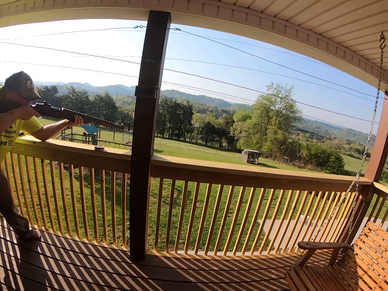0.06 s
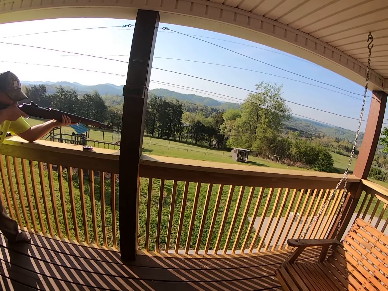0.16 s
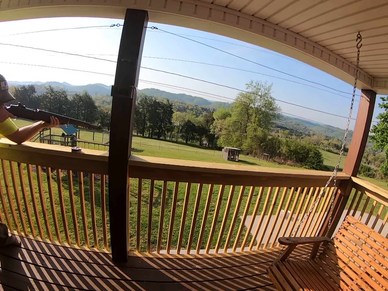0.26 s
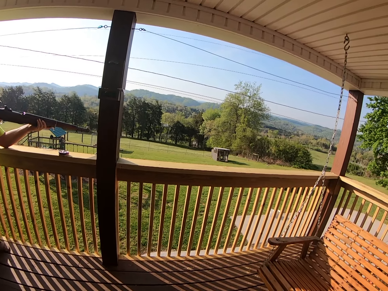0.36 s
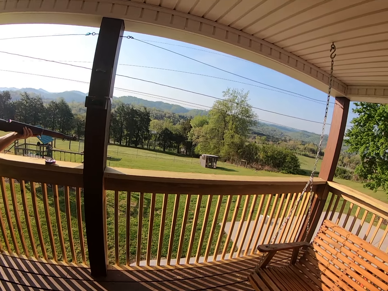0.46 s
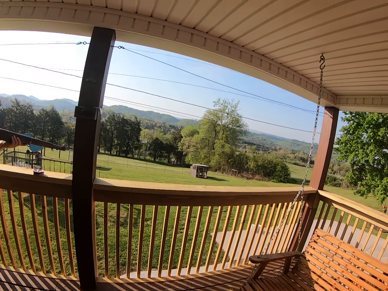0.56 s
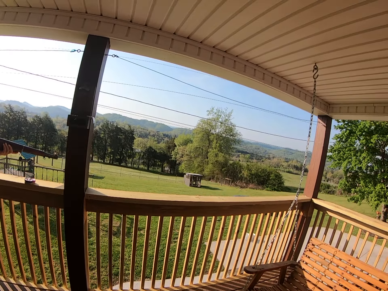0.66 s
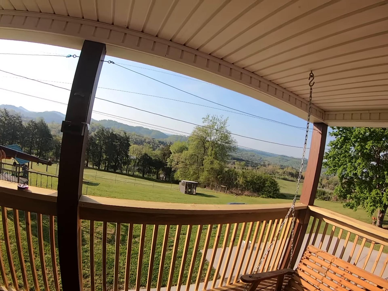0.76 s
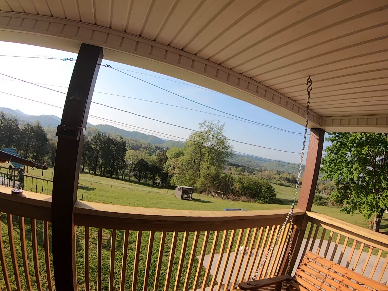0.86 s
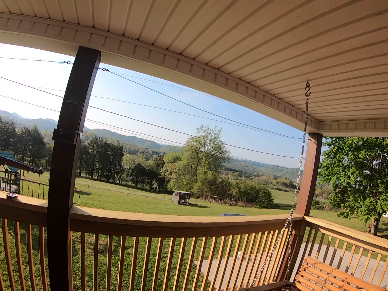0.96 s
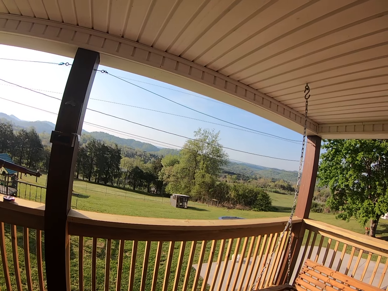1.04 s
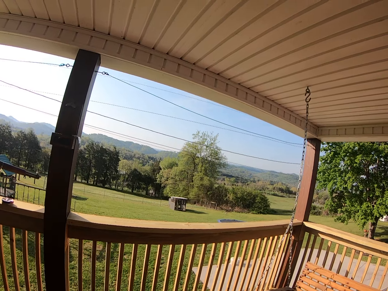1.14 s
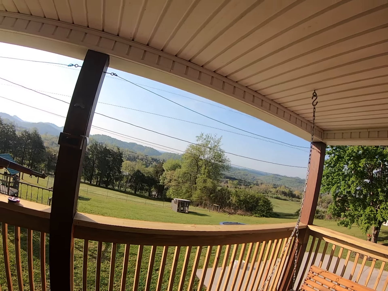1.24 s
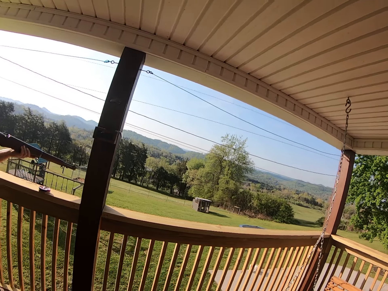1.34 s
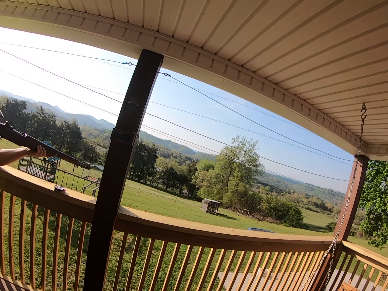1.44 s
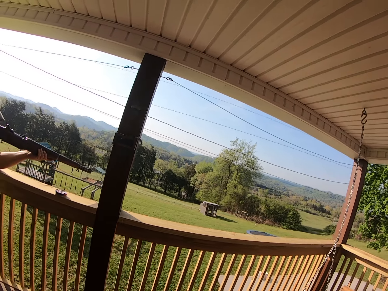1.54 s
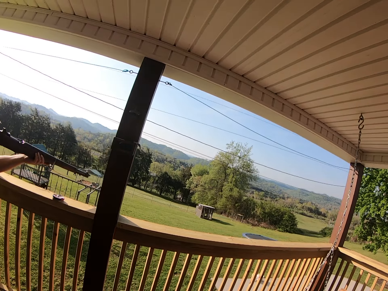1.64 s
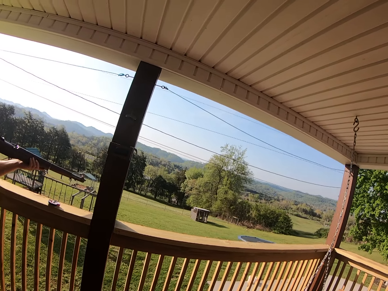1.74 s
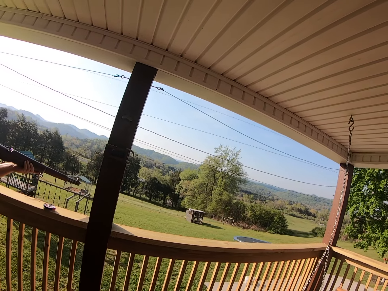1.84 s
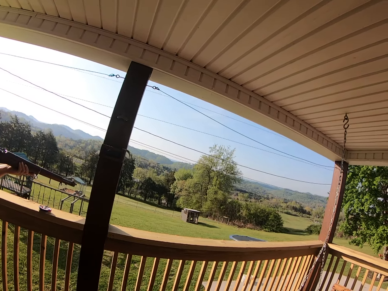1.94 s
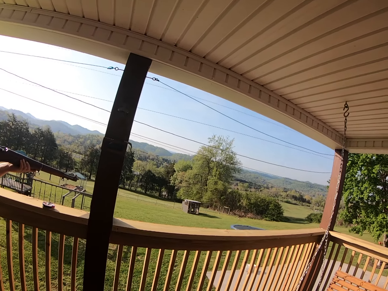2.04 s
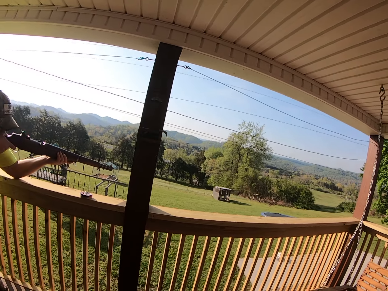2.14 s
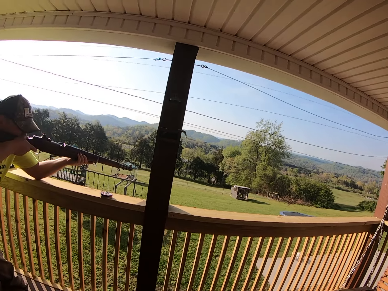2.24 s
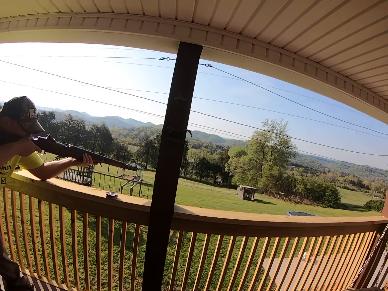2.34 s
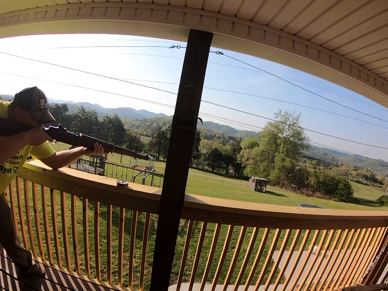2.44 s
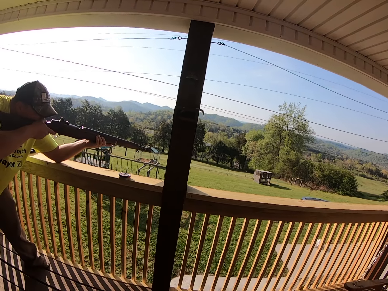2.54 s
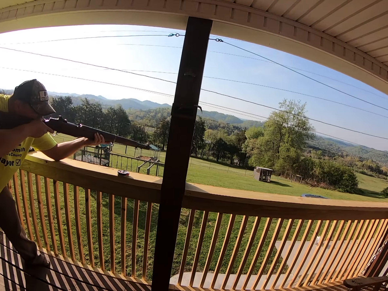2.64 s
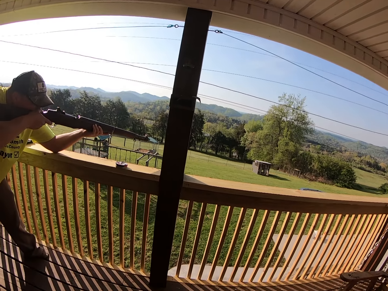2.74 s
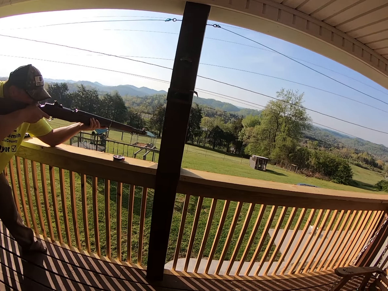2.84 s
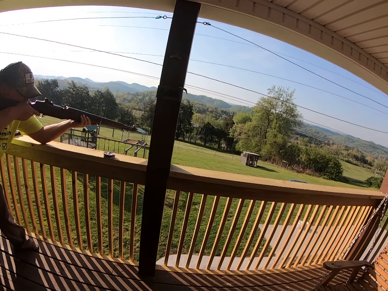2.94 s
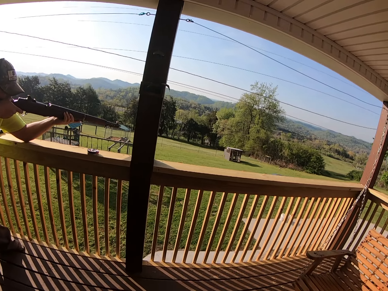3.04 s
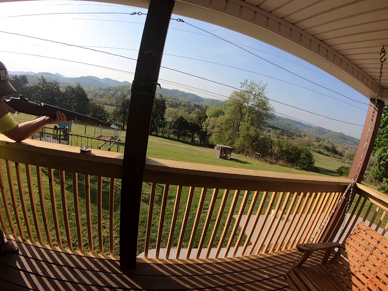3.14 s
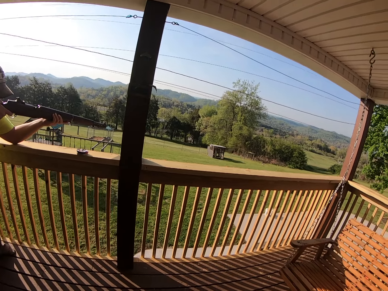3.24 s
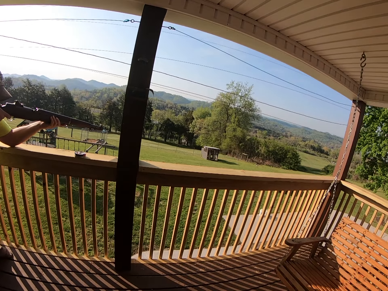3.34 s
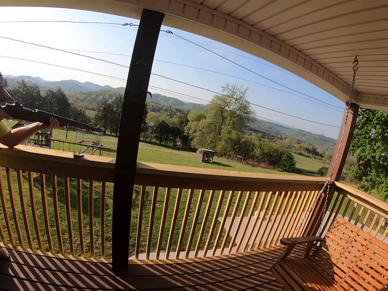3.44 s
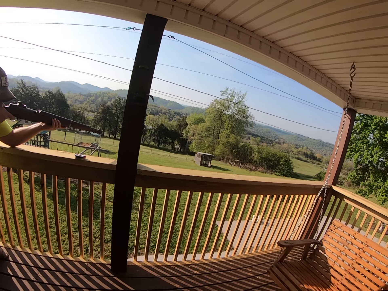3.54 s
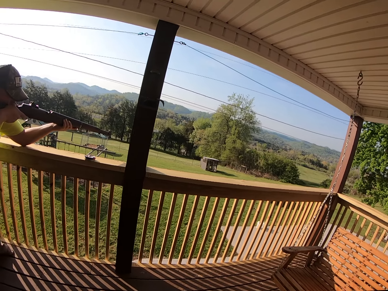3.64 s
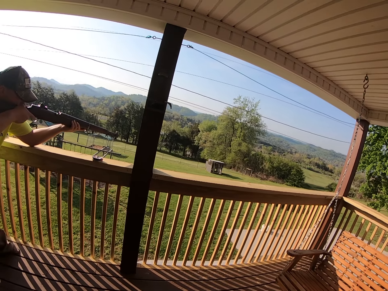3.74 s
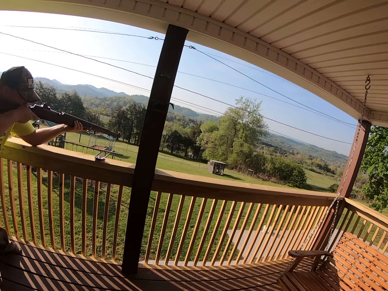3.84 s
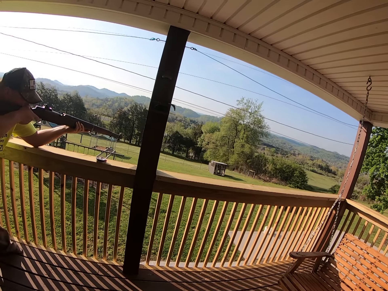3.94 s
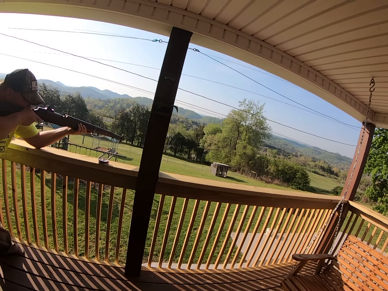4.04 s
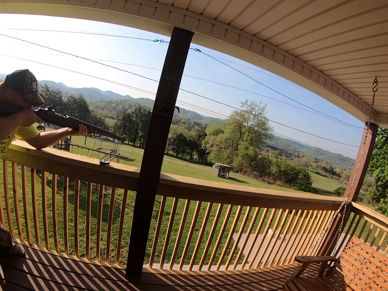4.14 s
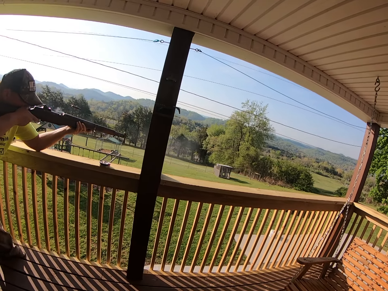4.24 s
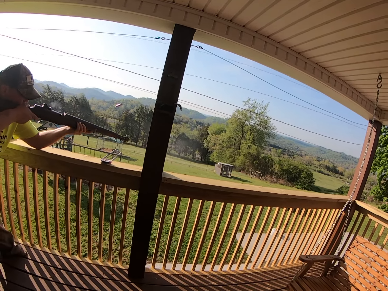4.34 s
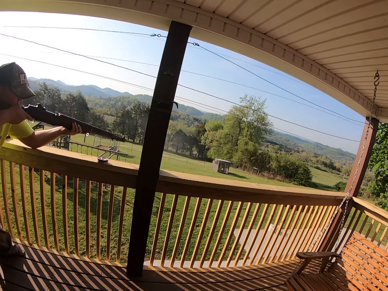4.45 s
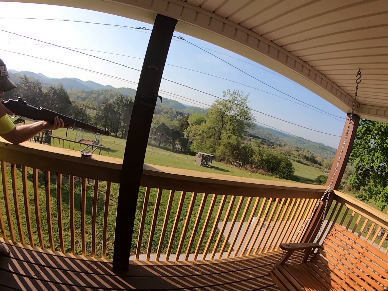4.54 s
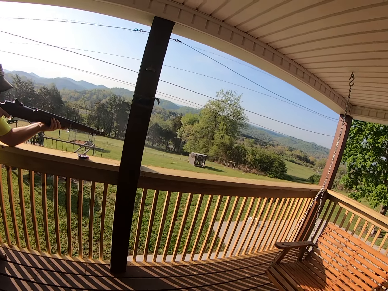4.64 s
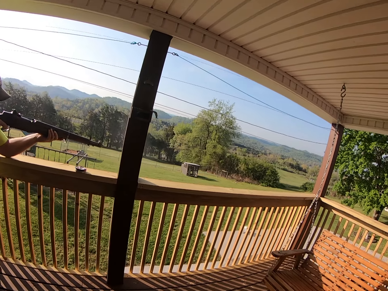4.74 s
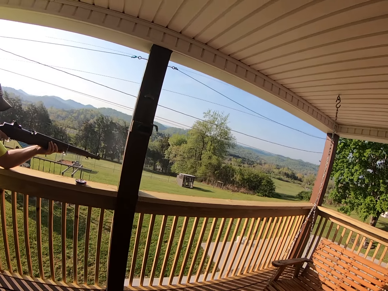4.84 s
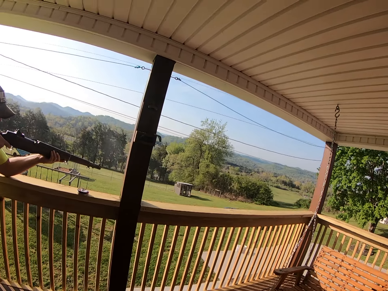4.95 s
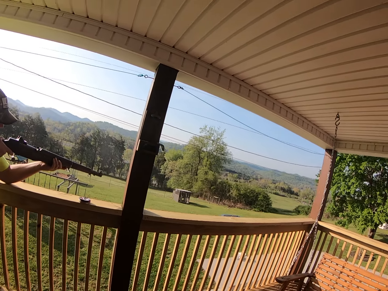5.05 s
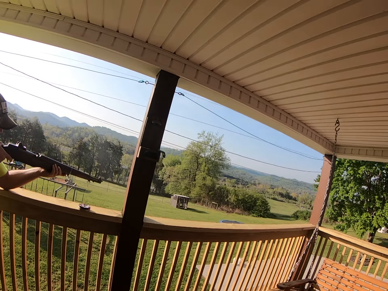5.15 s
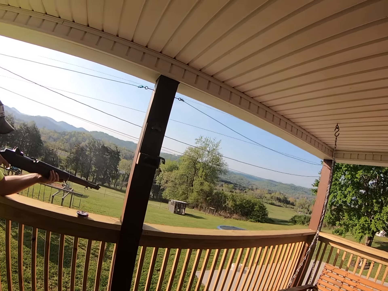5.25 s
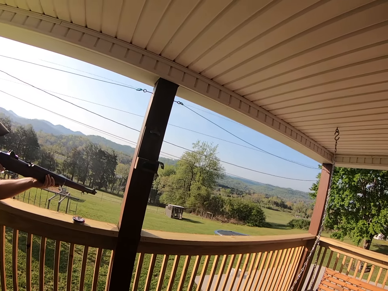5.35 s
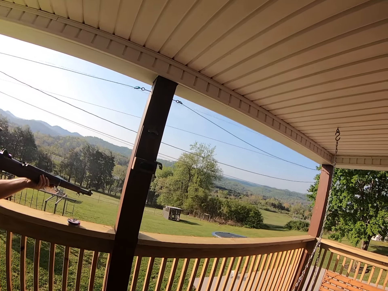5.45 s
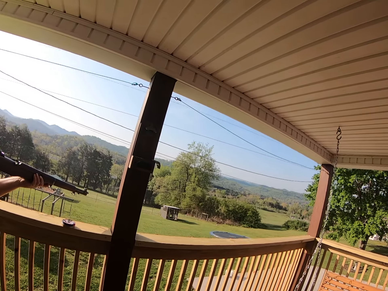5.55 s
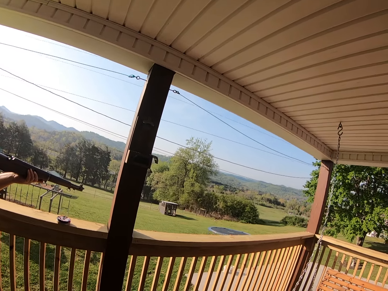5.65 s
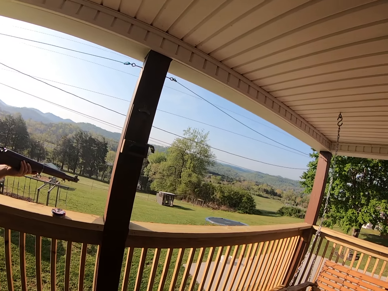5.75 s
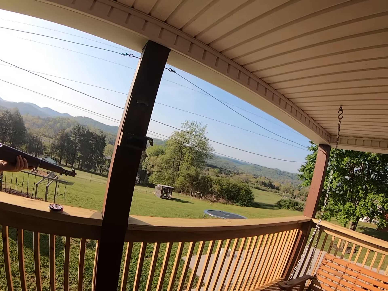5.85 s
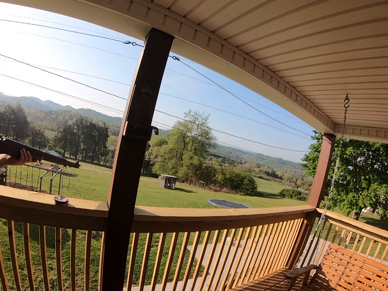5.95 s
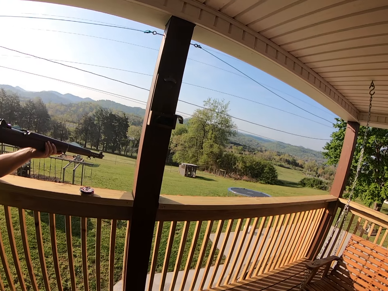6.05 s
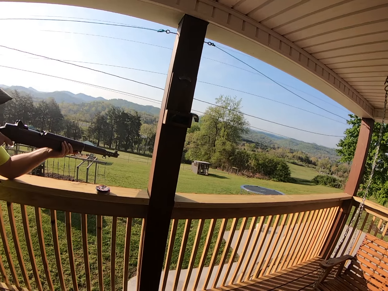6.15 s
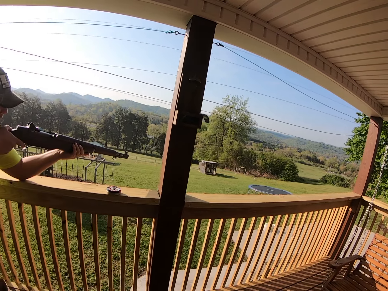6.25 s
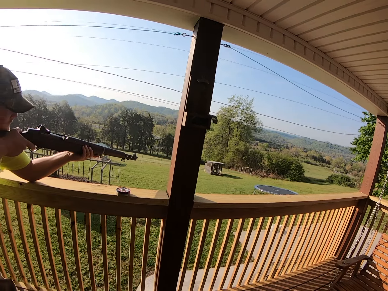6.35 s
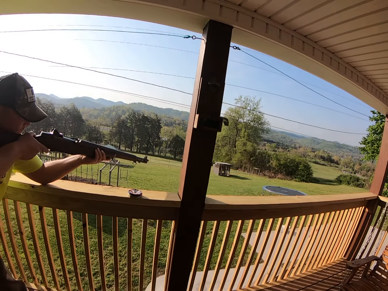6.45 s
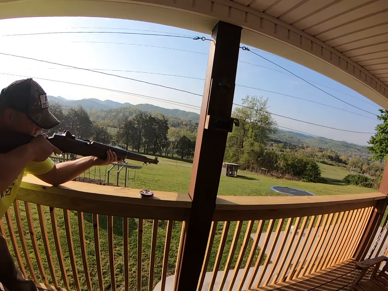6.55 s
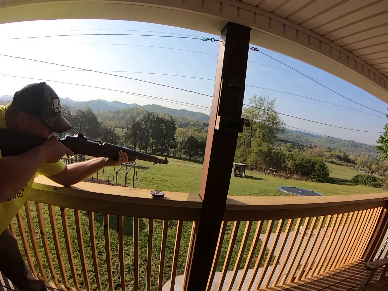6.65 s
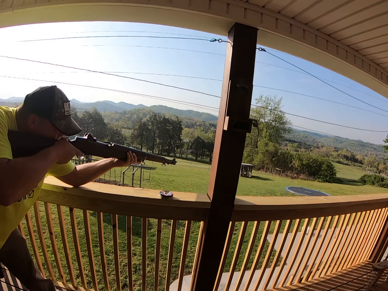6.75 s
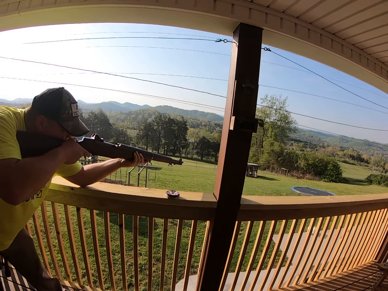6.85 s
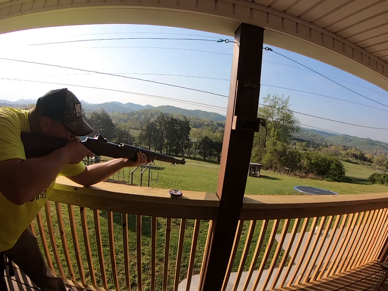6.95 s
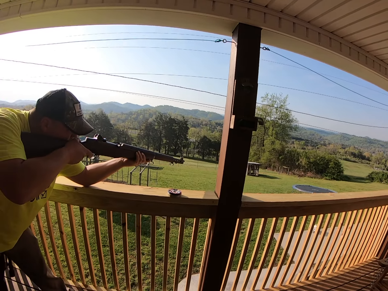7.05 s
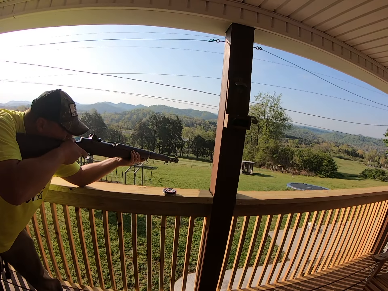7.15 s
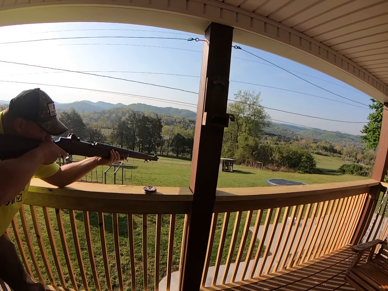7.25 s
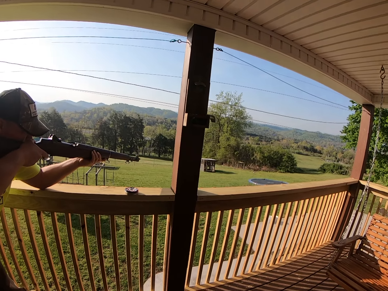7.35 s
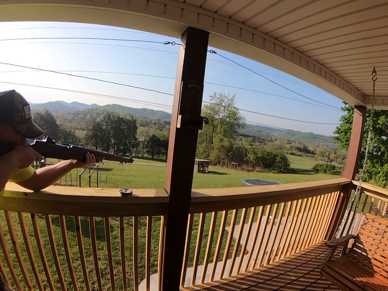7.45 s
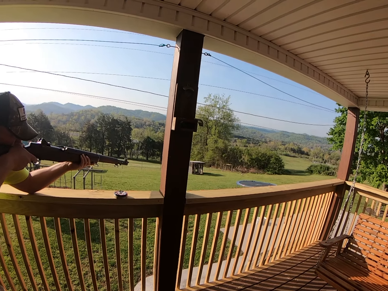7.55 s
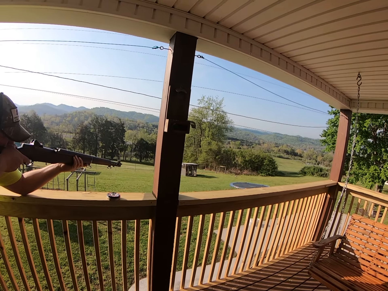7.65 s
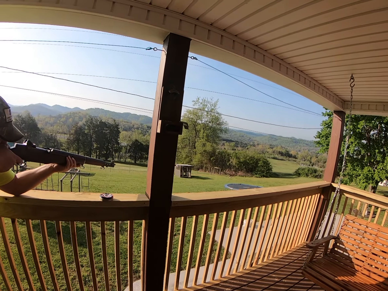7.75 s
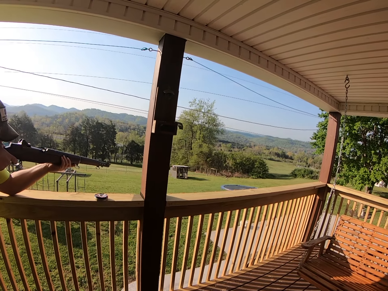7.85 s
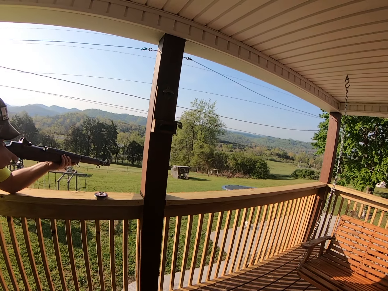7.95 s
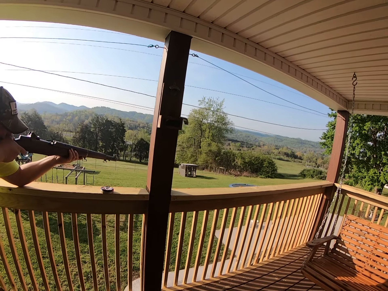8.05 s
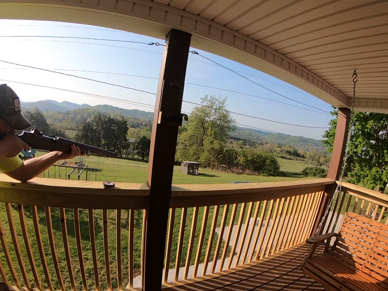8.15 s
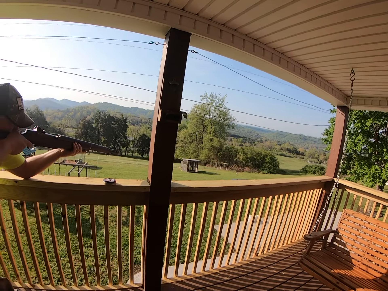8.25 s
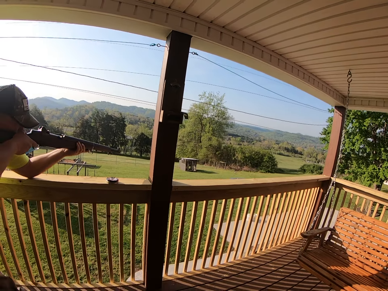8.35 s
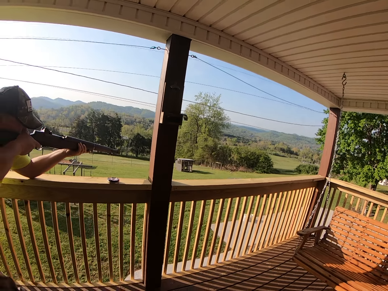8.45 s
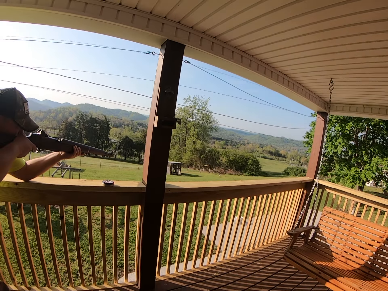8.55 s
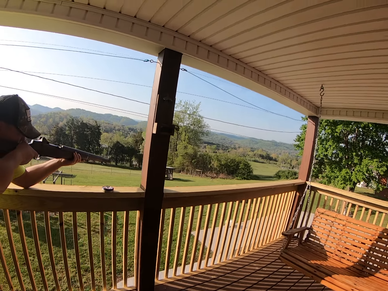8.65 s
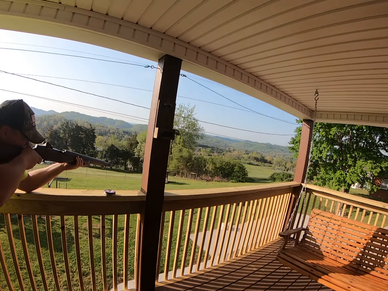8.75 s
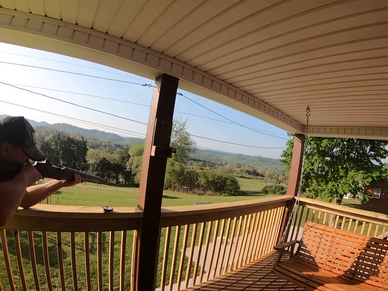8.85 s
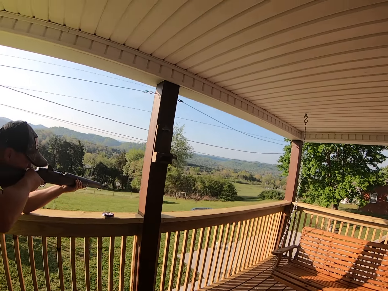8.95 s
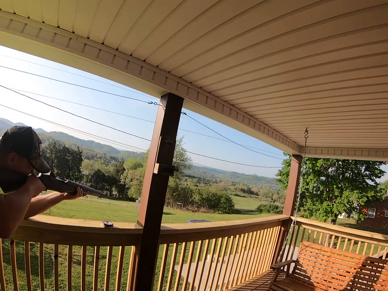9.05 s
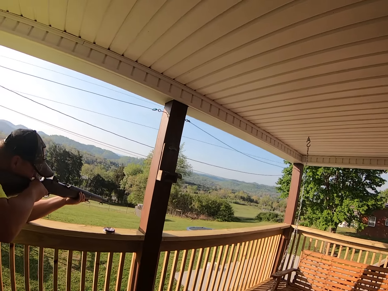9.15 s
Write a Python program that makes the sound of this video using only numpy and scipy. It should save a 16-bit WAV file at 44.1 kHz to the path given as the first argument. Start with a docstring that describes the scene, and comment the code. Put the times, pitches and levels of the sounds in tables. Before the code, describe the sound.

A single loud rifle shot breaks through faint birdsong, followed by a shell case bouncing on boards and rolling distant echoes.

```python
"""Birds sing over open fields until a rifle cracks from a wooden porch, a few metres from the listener.
The blast drives the porch's resonances, reflects off near walls, scatters off trees and rolls back
from far hills, its treble absorbed by the air. The spent brass case rings as it bounces on the boards.
Throughout, distant traffic murmurs; close by, clothes rustle, small parts tick and a hand bumps the camera."""
import sys
import numpy as np
from scipy import signal
from scipy.io import wavfile

SR = 44100
rng = np.random.default_rng(int(sys.argv[2]) if len(sys.argv) > 2 else 0)


def output_pcm(signal):
    """Save a mono or channel-first signal as 16-bit PCM at the path in sys.argv[1].

    Samples are clipped to [-1, 1] before scaling.
    """
    pcm = np.clip(np.atleast_2d(signal).T, -1, 1) * 32767
    wavfile.write(sys.argv[1], SR, np.round(pcm).astype(np.int16))


N = 405719
T = np.arange(N) / SR


def undb(db):
    """Decibels to amplitude ratio."""
    return 10 ** (np.asarray(db) / 20)


def at_hz(table, hz):
    """Interpolates (frequency_hz, value) rows on a logarithmic frequency axis."""
    frequencies, values = np.transpose(table)
    return np.interp(np.log(hz), np.log(frequencies), values)


def band(x, hz, width, order=1):
    """Band-pass filter around hz; at order 1, a damped resonator."""
    low = max(hz - width / 2, hz / 4)
    high = min(low + width, .48 * SR)
    return signal.sosfilt(signal.butter(order, [low, high], "bandpass", fs=SR, output="sos"), x)


def noise(shape, hz, width):
    """Band-limited Gaussian noise of unit RMS."""
    x = band(rng.standard_normal(shape), hz, width, order=2)
    return x / np.sqrt(np.mean(x ** 2))


def flutter(rate, size):
    """Random modulation: rate values a second joined by lines, standard deviation near 1."""
    knots = 1.12 * rng.standard_normal(int(size * rate / SR) + 2)
    return np.interp(np.arange(size) * rate / SR, np.arange(len(knots)), knots)


def pan(db):
    """Level difference between channels, left minus right."""
    return undb([[db / 2], [-db / 2]])


def add(out, start_s, x):
    """Superposes x on out."""
    i = int(start_s * SR)
    out[..., i:i + x.shape[-1]] += x[..., :N - i]


def diffuse(spectrum, start_s, end_s, envelope_db, flicker_db, octaves=.33):
    """Diffuse field: partly coherent noise bands follow envelope_db(hz, t), each flickering alone."""
    # likeness of left and right: frequency_hz, correlation
    coherence = [(60, 1), (130, 0.92), (290, 1), (640, 0.2), (1410, 0), (3100, 0.6), (6820, 0),
                 (15000, 0.05)]
    a, b = int(start_s * SR), min(int(end_s * SR), N)
    low, high = spectrum[0][0], spectrum[-1][0]
    centres = low * 2 ** np.arange(octaves / 2, np.log2(high / low), octaves)
    weights = undb(at_hz(spectrum, centres)) * np.sqrt(centres)
    out = np.zeros((2, N))
    for hz, weight in zip(centres, weights / np.linalg.norm(weights)):
        mid, side = noise((2, b - a), hz, hz * octaves * np.log(2))
        alike = at_hz(coherence, hz)
        pair = np.sqrt((1 + alike) / 2) * mid + np.sqrt((1 - alike) / 2) * side * [[1], [-1]]
        out[:, a:b] += weight * pair * undb(envelope_db(hz, T[a:b]) + flicker_db * flutter(14, b - a))
    return out


def reverberate(x, t60_s, wet_db, hz, width):
    """Reverberation: x plus its convolution with decaying noise, independent for each ear."""
    t = np.arange(int(t60_s * SR)) / SR
    response = band(rng.standard_normal((2, len(t))), hz, width) * undb(-60 * t / t60_s)
    response /= np.linalg.norm(response[0])
    return x + undb(wet_db) * signal.fftconvolve(np.atleast_2d(x), response, axes=1)[:, :N]


def field():
    """Distant traffic, air and leaves sum incoherently to a diffuse background."""
    # the background sinks after the shot and creeps back: time_s, level_db
    contour = [(0, -53), (4.3, -55), (4.901, -68), (6.6, -68), (7.999, -63), (9.2, -58)]
    # its spectrum: frequency_hz, relative_density_db
    spectrum = [(13, -38), (22, -7.5), (87, 0), (407, -11), (680, -18), (844, -25.5), (966, -20),
                (1450, -16.5), (1950, -22), (2840, -23), (3930, -28.5), (6230, -70), (8850, -36),
                (14000, -67)]
    times, levels = np.transpose(contour)
    return diffuse(spectrum, 0, N / SR, lambda hz, t: np.interp(t, times, levels),
                   flicker_db=3.7, octaves=.5)


def bird_buzzes():
    """Far calls spread their energy over a band, so they buzz rather than whistle."""
    # calls: start_s, end_s, centre_hz, width_hz, level_db
    calls = [(0, 0.17, 2860, 120, -60.5), (0.234, 0.303, 4900, 800, -64.5), (0.439, 0.698, 4130, 250, -59),
             (0.749, 1.044, 4060, 300, -67), (2.198, 2.62, 4000, 900, -67), (3.42, 4.2, 5220, 80, -78.5),
             (2.66, 2.794, 4080, 150, -68.5), (3.414, 3.575, 3800, 1600, -65), (0, 0.238, 2340, 302, -66),
             (0.54, .75, 2740, 200, -67), (7.67, 7.75, 4490, 350, -66), (7.82, 7.89, 4220, 448, -64)]
    out = np.zeros(N)
    for start, end, hz, width, db in calls:
        buzz = noise(int((end - start) * SR), hz, width)
        add(out, start, undb(db) * buzz * np.hanning(len(buzz)) ** .31)
    return out


def clothes():
    """Friction noise of cloth; overlapping rustles add in power."""
    # rustles, whose swell and fade each span 20 dB: peak_s, level_db, swell_s, fade_s
    rustles = [(.01, -70, 0.011, 0.25), (.31, -74, .025, 0.12), (.57, -80, .03, .04),
               (1.1, -63.5, 0.013, 0.073), (1.37, -67, 0.034, .32), (1.94, -55.5, 0.0081, 0.078),
               (2.18, -70, 0.091, .11), (2.41, -56.5, 0.085, .07), (2.9, -60, 0.094, 0.36),
               (3.2, -69.5, .17, 0.9), (3.66, -61, 0.074, 0.28), (4.17, -67.5, 1, 0.23),
               (6.38, -76, 0.13, .055), (6.48, -72.5, .013, 0.051), (7.3, -64, 0.035, 0.22),
               (7.62, -61, .1, 0.27), (7.92, -64.5, 0.31, 0.14), (8.08, -74.5, .04, 0.33),
               (8.27, -68, .11, 0.36), (8.6, -62, 0.26, 0.17), (8.78, -63, 0.012, 1),
               (9.14, -53.5, 0.44, 0.078)]
    # cloth spectrum: frequency_hz, relative_density_db
    spectrum = [(1500, -4), (3000, 3.5), (5000, -5.5), (6300, -7.5), (8500, 0), (10500, -10),
                (14000, -20.5)]
    power = sum(undb(db - 20 * np.maximum((peak - T) / swell, (T - peak) / fade)) ** 2
                for peak, db, swell, fade in rustles)
    level_db = 10 * np.log10(power + 1e-12)
    return diffuse(spectrum, 0, N / SR, lambda hz, t: level_db, flicker_db=1.2, octaves=.3315)


def whistle(out, contour, at_s=0., db=0., pitch_ratio=.98):
    """A sine glides along contour, its pitch times pitch_ratio; moving air modulates its amplitude."""
    times, pitches, levels = np.transpose(contour)
    t = np.arange(times[0], times[-1], 1 / SR)
    ramps = np.clip(np.minimum(t - t[0], t[-1] - t) / .0022, 0, 1)
    gain = np.sqrt(2) * ramps * undb(db + np.interp(t, times, levels) + 2.5 * flutter(90, len(t)))
    phase = 2 * np.pi * np.cumsum(pitch_ratio * np.interp(t, times, pitches)) / SR
    add(out, at_s + t[0], gain * np.sin(phase))


def bird_whistles():
    """Frequency-modulated tones: chips, glides, a long fall and rising sweeps."""
    # one long falling whistle: time_s, nominal_pitch_hz, level_db
    fall = [(0.42, 5804, -67), (0.533, 4670, -68), (0.632, 3770, -52.5), (0.731, 3435, -49),
            (0.806, 2734, -63), (0.934, 2434, -65), (0.998, 2140, -59), (1.05, 2100, -78)]
    # an up-and-down chip: offset_s, nominal_pitch_hz, relative_db
    chip = [(0, 2700, -0.5), (.024, 3195, 0.5), (.052, 2920, -18)]
    # its occurrences: start_s, level_db
    chips = [(.245, -55), (1.24, -52)]
    # gliding or held notes: start_s, length_s, nominal_first_hz, nominal_last_hz, level_db
    glides = [(.305, .105, 5950, 3750, -64), (1.16, .055, 2400, 1850, -57), (2.96, .115, 6445, 3950, -68),
              (3.14, .1, 1610, 1600, -64), (3.5, .04, 5170, 5170, -65), (3.58, .23, 2670, 2690, -64),
              (3.84, .11, 2690, 2660, -63), (3.98, .26, 2670, 2680, -66)]
    # a rising sweep: offset_from_end_s, nominal_pitch_hz, relative_db
    sweep = [(-.105, 1754, -13), (-.08, 1801, -4.5), (-.055, 1976, -0.5), (-.04, 2339, 0), (-.028, 2755, 1),
             (-.016, 2950, -1.5), (-.006, 3430, -3.5), (0, 4250, 0.5)]
    # its occurrences: end_s
    sweep_ends = [1.523, 1.762, 1.996, 2.219, 2.439, 2.664, 2.888, 3.121, 3.344, 3.569]
    # a fainter bird's rise: offset_from_end_s, nominal_pitch_hz, relative_db
    rise = [(-.08, 2722, -1.5), (-.04, 2993, 4.5), (-.02, 3500, 4.5), (0, 4400, -8)]
    # its occurrences: end_s, level_db
    rises = [(3.24, -68), (3.4, -68), (3.69, -65), (4.12, -67)]
    out = np.zeros(N)
    whistle(out, fall)
    for start, db in chips:
        whistle(out, chip, start, db)
    peak_share, bend = .73, 1.3  # a glide is loudest late; bend over 1 moves its pitch slowly at first
    for start, length, first_hz, last_hz, db in glides:
        peak_hz = first_hz * (last_hz / first_hz) ** (peak_share ** bend)
        contour = [(0, first_hz, -3), (peak_share * length, peak_hz, 0), (length, last_hz, -2)]
        whistle(out, contour, start, db)
    for end, jitter in zip(sweep_ends, rng.standard_normal(len(sweep_ends))):
        whistle(out, sweep, end, db=-52, pitch_ratio=1 + .01035 * jitter)
    for end, db in rises:
        whistle(out, rise, end, db)
    return out


def drones():
    """Narrow-band noise is heard as faint, wavering pitches that come and go."""
    # drones: centre_hz, width_hz, start_s, end_s, level_db
    hums = [(87.5, 8.2, 2, 3.56, -54.5), (543.2, 8.7, 0.7, 3.5, -68), (1450, 230, 0.5, 3.34, -67),
            (1272, 28, 6.5, 8.8, -61), (294.6, 30, 7.5, 8.05, -43.5), (304.9, 48, 7.3, 10, -53.5)]
    fade_s = .2
    return sum(undb(db) * noise(N, hz, width) * np.clip(np.minimum(T - start, end - T) / fade_s, 0, 1)
               for hz, width, start, end, db in hums)


def small_parts():
    """Light impacts: a bright tick and a damped knock that starts softer and lasts longer when low."""
    # impacts: start_s, knock_db, knock_hz, tick_db, left_minus_right_db
    impacts = [(1.097, -42.5, 557, -71, -5), (1.939, -42.5, 1950, -56, 2), (3.65, -61, 2610, -51, -6),
               (5.845, -47.5, 600, -90, 0), (6.195, -47, 600, -90, -2), (6.348, -44, 1060, -82, -3.5),
               (7.016, -41, 618, -91, -9.5), (7.287, -50, 2950, -61.5, 8), (7.548, -42, 484.4, -67, -1.5),
               (7.612, -46.5, 301, -63.5, -1), (8.011, -60, 433, -71, -2), (8.081, -49, 374, -67, -6),
               (8.213, -52, 2400, -76, -1), (8.781, -34, 350, -60, -1), (9.041, -43, 323, -64, -2.0)]
    out = np.zeros((2, N))
    t = np.arange(int(.06 * SR)) / SR
    for start, knock_db, hz, tick_db, pan_db in impacts:
        knock = noise(len(t), hz, .58 * hz) * np.exp(-t * hz / 7.3) * np.clip(t * hz, 0, 1)
        tick = noise(len(t), 8400, 2900) * np.exp(-t / .0041)
        add(out, start, (undb(knock_db) * knock + undb(tick_db) * tick) * pan(pan_db))
    return reverberate(out, t60_s=.11, wet_db=-.5, hz=3100, width=9000)


def hand_bumps():
    """Structure-borne sound: a hand shakes the camera for a few cycles of deep bass."""
    # bumps: start_s, level_db
    bumps = [(1.449, -48.5), (7.399, -56.5), (8.859, -44), (9.149, -37)]
    out = np.zeros(N)
    t = np.arange(int(.12 * SR)) / SR
    for start, db in bumps:
        add(out, start, undb(db) * np.sin(2 * np.pi * 28.5 * t) * np.hanning(len(t)))
    return out


def bird_trill():
    """A periodic train of falling chips, growing louder and slightly higher."""
    # one chip: offset_s, nominal_pitch_hz, relative_db
    chip = [(0, 4550, -6), (.004, 4448, 0.5), (.009, 4350, -2), (0.015, 4066, -8)]
    start_s, period_s = 3.898, .0275
    out = np.zeros(N)
    for k, jitter in enumerate(rng.standard_normal(14)):
        db = -61 + .6 * k + 1.3 * jitter
        whistle(out, chip, start_s + k * period_s, db, pitch_ratio=1 + .0027 * (k - 7))
    return out


def birds():
    """Trees reverberate every call; the nearer trill has a higher direct-to-reverberant ratio."""
    whistles, trill = bird_whistles(), bird_trill()
    trees = dict(t60_s=.7, hz=3500, width=5000)
    far = reverberate(whistles + bird_buzzes(), wet_db=-5, **trees)
    return far + reverberate(trill, wet_db=-8, **trees)


def blast():
    """Each arrival is an N-shaped pressure wave that also excites the porch's resonant modes."""
    # short pulses crack, long ones are dull slaps off walls: start_s, direct_db, porch_drive_db, length_s
    arrivals = [(4.2735, -24.5, -22, 0.00027), (4.2943, -36, -4.5, 0.0014), (4.3, -32, 0.5, .0014),
                (4.3068, -20, 0.5, 0.0012), (4.3165, 1.5, 6, 0.00023), (4.3175, -3, -16, 0.00018),
                (4.4972, -17, -26, 0.0008), (4.498, -10.5, -26, 0.0063), (4.541, -15, -29, 0.0086),
                (4.594, -22, -18, 0.0033), (4.735, -34, -39, 0.01)]
    # porch modes: frequency_hz, width_hz, gain_db
    modes = [(144.8, 8.3, 15.5), (288, 40, 5), (510, 33, 2), (610, 19, 11.5), (680, 4.7, 1), (886.4, 16, 5),
             (1091, 21, 0.5), (3328, 720, 2.5), (6260, 500, -7)]
    direct, drive = np.zeros((2, N))
    for start, direct_db, drive_db, length in arrivals + early_reflections():
        cycle = np.arange(0, 1, 1 / (length * SR))
        pulse = -np.sin(2 * np.pi * cycle) * (1 - .88 * cycle)
        add(direct, start, undb(direct_db) * pulse)
        add(drive, start, undb(drive_db) * pulse)
    ring = sum(undb(db) * band(drive, hz, width) for hz, width, db in modes)
    return reverberate(direct + ring, t60_s=.06, wet_db=-9, hz=3600, width=5600) * pan(-2)


def early_reflections(count=8):
    """Weak reflections off posts and rails grow toward the main crack; rows as in blast's arrivals."""
    place, size = rng.random((count, 2)).T
    progress = (np.arange(count) + place) / count
    start_s = 4.278 + .043 * progress
    direct_db = -35 + 14.5 * progress
    length_s = .00058 * (.5 + size)
    return list(zip(start_s, direct_db, direct_db + 13.5, length_s))


def tree_scatter():
    """Scattering by trees draws the blast out into a tail that loses its highest treble first."""
    # scattered spectrum: frequency_hz, relative_density_db
    spectrum = [(24, -43.5), (40, -8.5), (80, -1.5), (132, -3), (174, -2), (390, -8), (484, -13.5),
                (704, -12), (2060, -14), (2770, -20.5), (6000, -27.5), (8300, -20), (10500, -28),
                (15500, -32)]
    # reverberation time: frequency_hz, t60_s
    decay_times = [(40, 1), (120, 0.87), (240, 1.19), (1000, 1.77), (2700, 1.8), (5400, 1.21),
                   (11000, 0.72)]
    start_s, rise_s = 4.274, .076
    clumps_db = 1.7 * flutter(45, N)  # clumps of trees send their echoes back together

    def envelope_db(hz, t):
        age = t - start_s
        past_peak = np.maximum(age - rise_s, 0)
        rise_db = 8.3 * np.log10(np.clip(age / rise_s, .1, 1))
        early_db = 2.5 * np.exp(-past_peak / .035)  # near surfaces answer louder at first
        decay_db = 60 * past_peak / at_hz(decay_times, hz)
        return -20 + rise_db + early_db - decay_db + clumps_db[:len(t)]
    return diffuse(spectrum, start_s, start_s + 4.2, envelope_db, flicker_db=2.5)


def hill_echoes():
    """Far echoes return in swells; air absorption dulls the later ones, which travel farther."""
    # swells before the treble tilt: time_s, level_db
    swells = [(5.0, -69), (5.116, -68.5), (5.26, -60), (5.68, -66.5), (5.82, -67.5), (5.85, -55),
              (6.03, -59), (6.17, -53.5), (6.54, -60.5), (6.659, -54.5), (6.72, -47.5), (6.98, -51.5),
              (7.05, -48.5), (7.29, -52), (7.33, -45), (7.66, -42.5), (7.79, -38.5), (8.04, -49.5),
              (8.11, -40.5), (8.31, -46), (8.76, -49.5), (9.0, -46.5), (9.05, -40), (9.2, -47.5)]
    # echo spectrum before the tilt: frequency_hz, relative_density_db
    spectrum = [(59, -49), (100, -35), (136, -21.5), (205, -8), (248, -7.5), (294, -2), (518, -10.5),
                (636, -7.5), (927, -11.5), (1280, -12.5), (2680, -28.5), (4000, -43), (6000, -61),
                (7800, -85.5), (13200, -120)]
    times, levels = np.transpose(swells)
    knee_hz = 377

    def envelope_db(hz, t):
        level_db = np.interp(t, times, levels)
        tilt_db_per_octave = np.maximum(7.5 - 2.5 * (t - times[0]), 1.37)
        tilt_db_per_octave -= .22 * (level_db + 54)  # loud swells are mostly bass
        return level_db + tilt_db_per_octave * np.log2(max(hz / knee_hz, 1))
    return diffuse(spectrum, times[0], times[-1], envelope_db, flicker_db=2.43)


def spent_case():
    """Each impact excites high, rough brass modes; a tick and a board knock linger under the roof."""
    # bounces: start_s, ring_db, tick_db, knock_db
    bounces = [(5.273, -56, -56, -39.5), (5.452, -62, -76, -29.5), (5.752, -57.5, -49, -45.5)]
    # brass modes: frequency_hz, relative_db, t60_s
    modes = [(7920, -14, .2), (8270, -2, .4), (9080, -12, .12), (10000, 0, .42), (10440, -3, .3),
             (13550, -7, .3), (14000, -4, .4)]
    t = np.arange(int(.5 * SR)) / SR
    stereo = (2, len(t))
    out = np.zeros((2, N))
    for start, ring_db, tick_db, knock_db in bounces:
        ring = sum(undb(db - 60 * t / t60) * noise(stereo, hz, width=150) for hz, db, t60 in modes)
        tick = noise(stereo, 3100, 4900) * undb(-60 * t / .31)
        knock = noise(stereo, 1360, 1630) * undb(-60 * t / .29) * np.clip(.23 + t / .015, 0, 1)
        add(out, start, undb(ring_db) * ring + undb(tick_db) * tick + undb(knock_db) * knock)
    return out


def scene():
    """Linear superposition of all sources, leaning a little to the right."""
    shot = blast() + tree_scatter() + hill_echoes()
    mix = shot + drones() + birds() + spent_case() + clothes() + small_parts() + hand_bumps() + field()
    return mix * pan(-1.24)


def record(dry):
    """Band limiting and clipping: the microphone shelves off treble; the camera clips and cuts the top."""
    mic_edge_hz, leak_db, top_hz = 9370, -22, 15700
    mic = signal.sosfilt(signal.butter(5, mic_edge_hz, fs=SR, output="sos"), dry) + undb(leak_db) * dry
    clipped = np.clip(mic, -.95, .95)
    return signal.sosfilt(signal.ellip(10, .2, 80, top_hz, fs=SR, output="sos"), clipped)


dry = scene()
out = record(dry)
output_pcm(out)
```